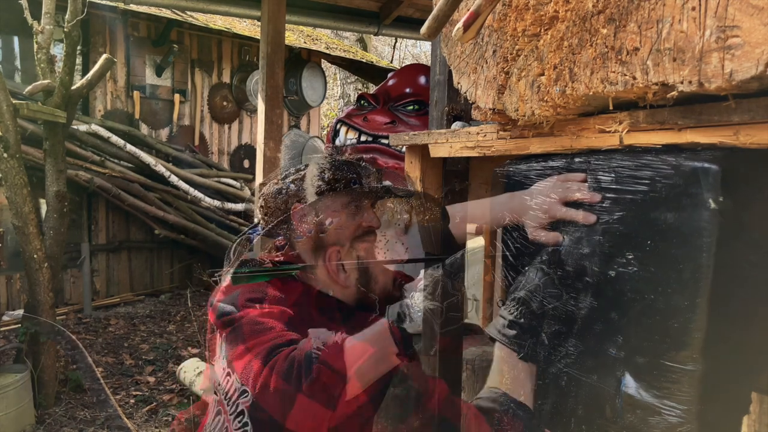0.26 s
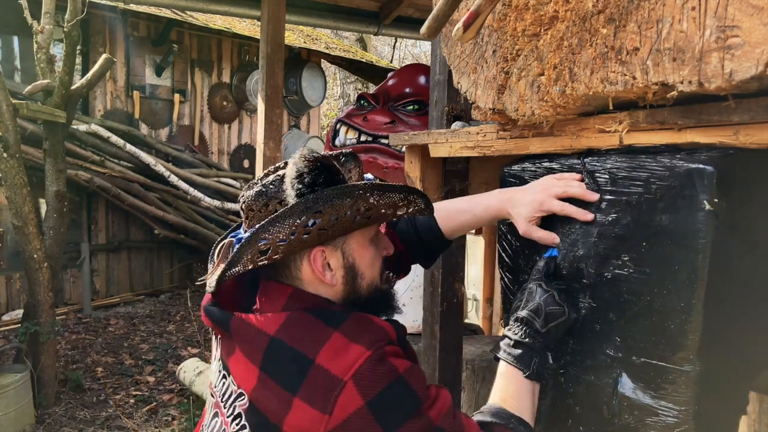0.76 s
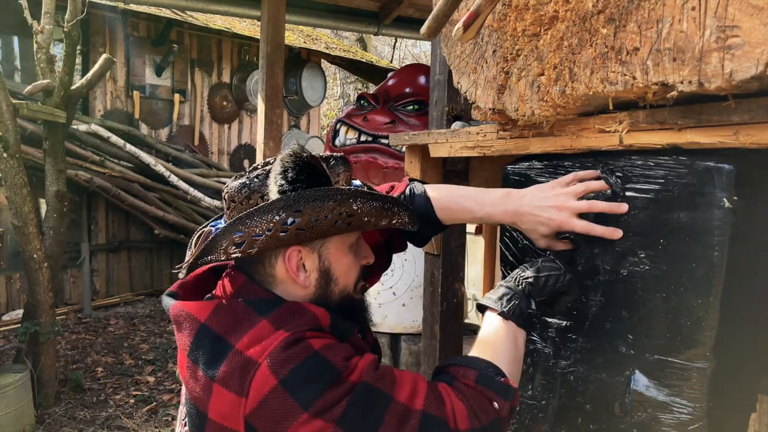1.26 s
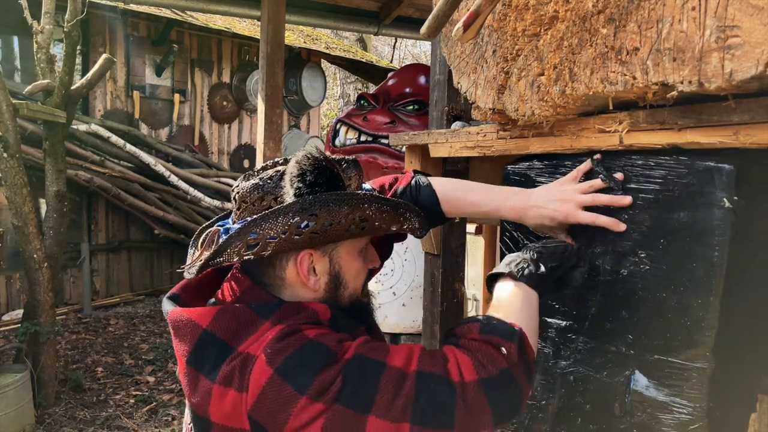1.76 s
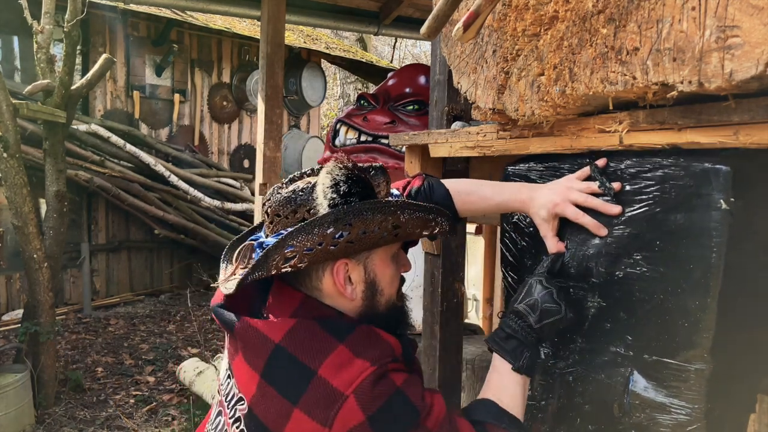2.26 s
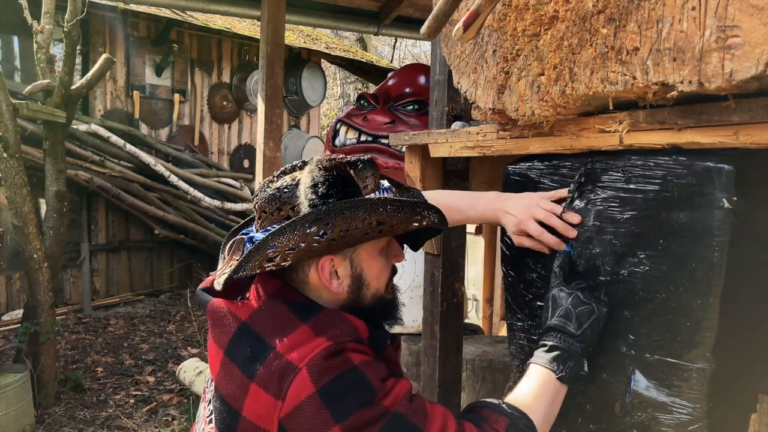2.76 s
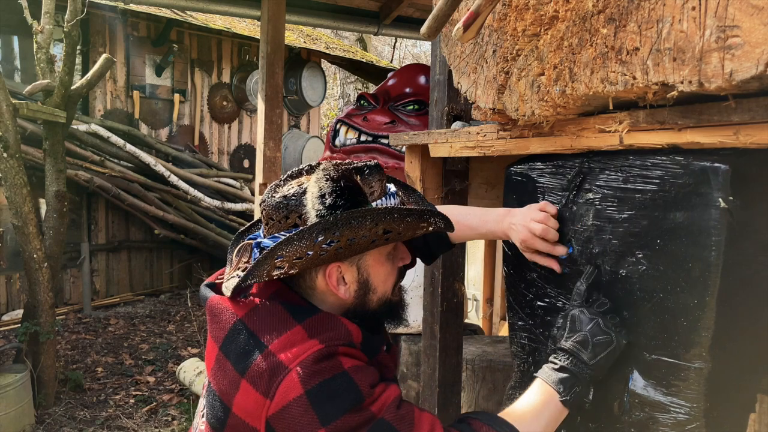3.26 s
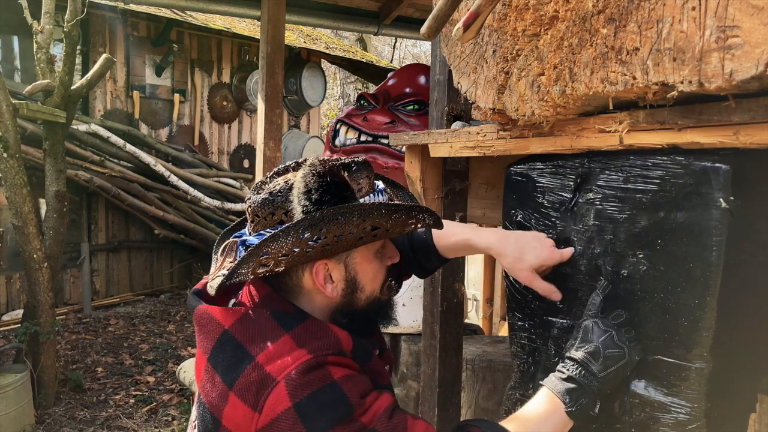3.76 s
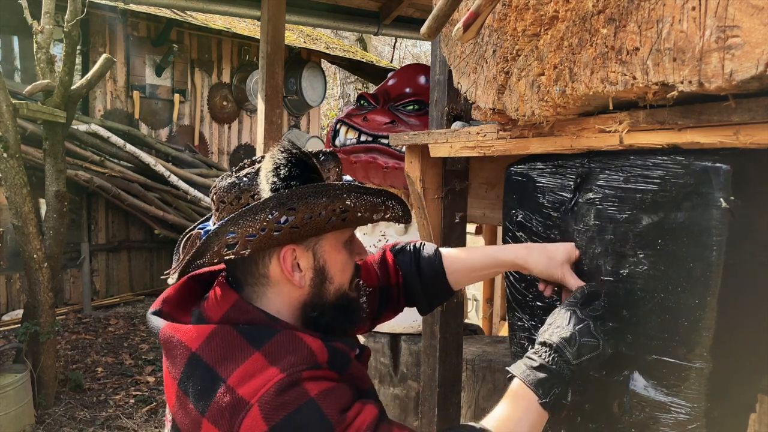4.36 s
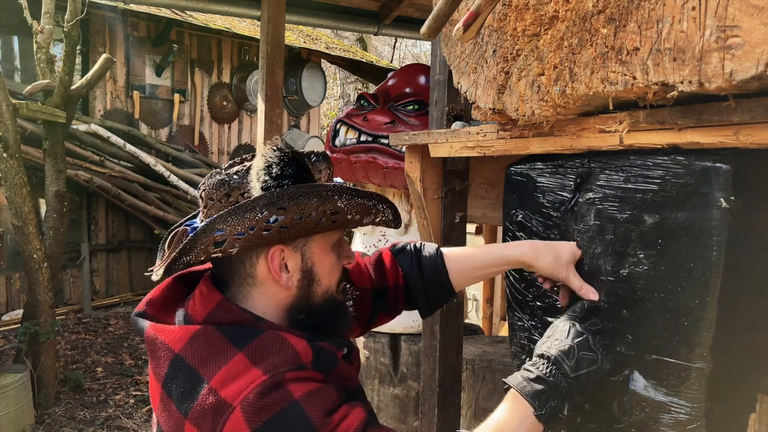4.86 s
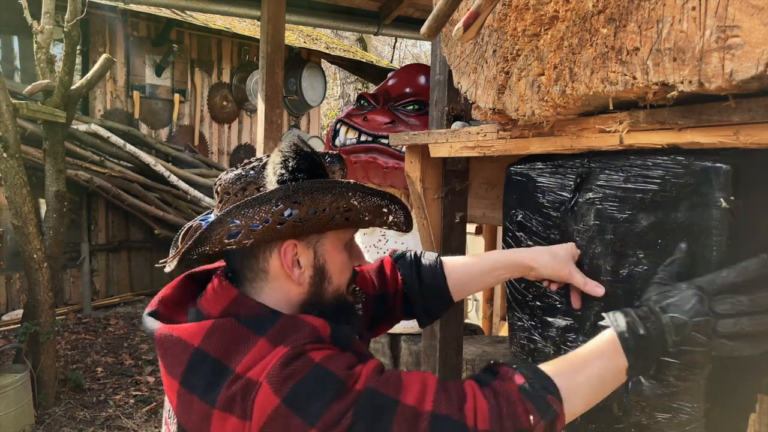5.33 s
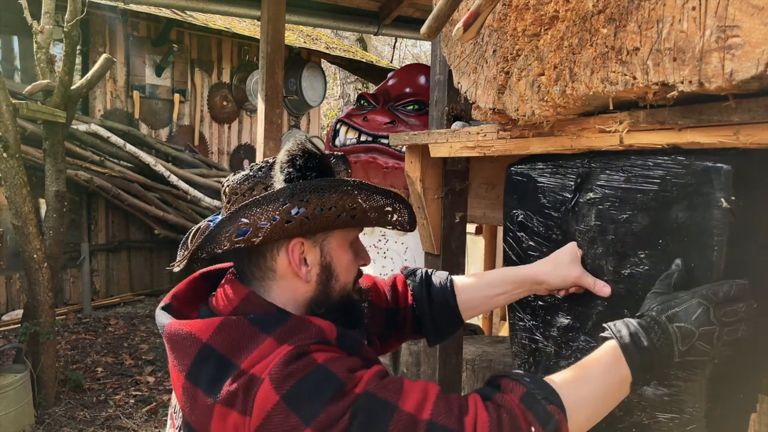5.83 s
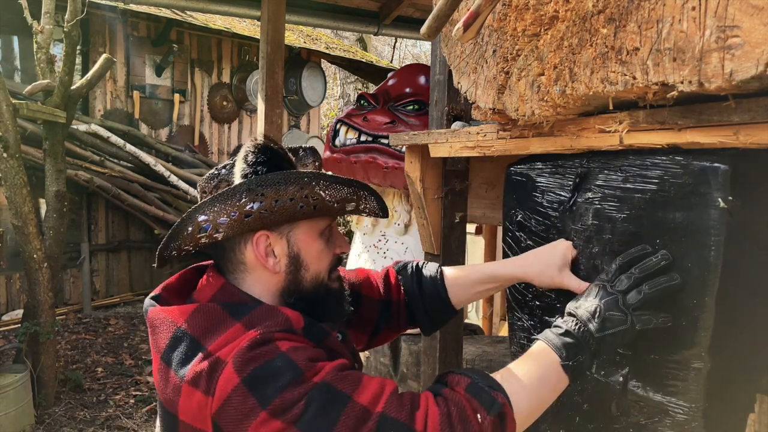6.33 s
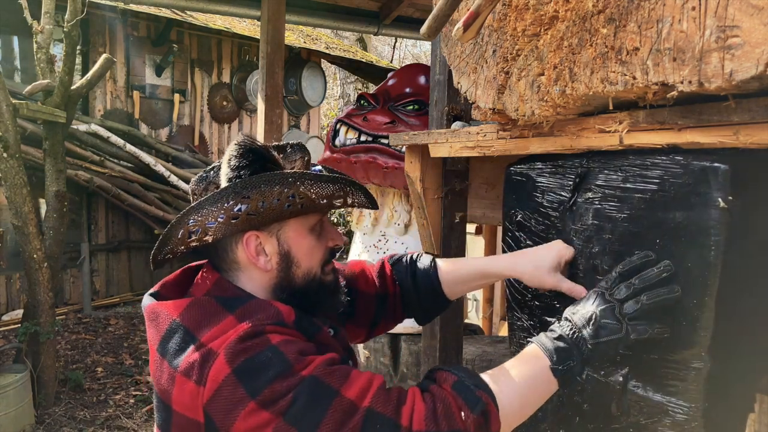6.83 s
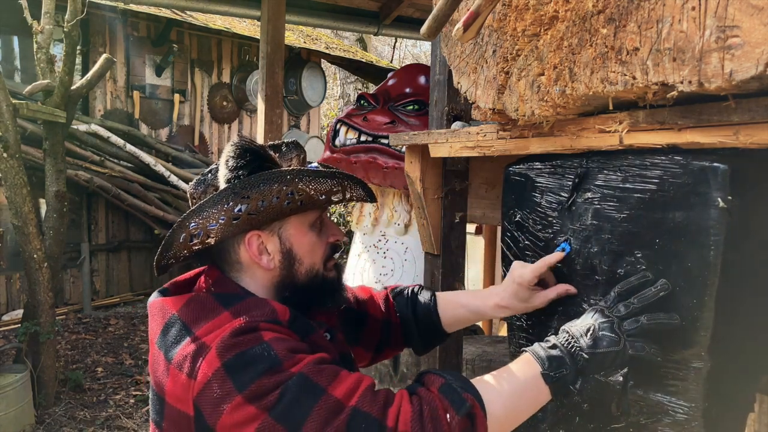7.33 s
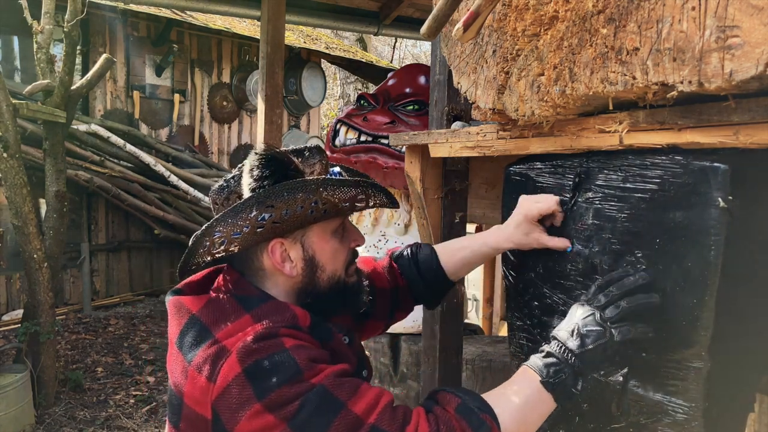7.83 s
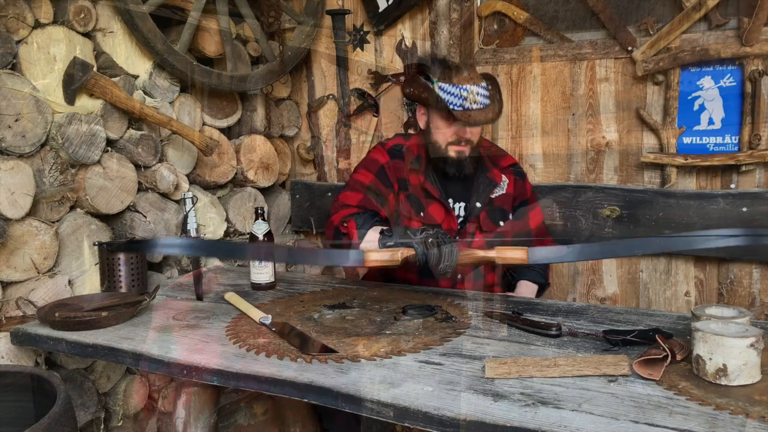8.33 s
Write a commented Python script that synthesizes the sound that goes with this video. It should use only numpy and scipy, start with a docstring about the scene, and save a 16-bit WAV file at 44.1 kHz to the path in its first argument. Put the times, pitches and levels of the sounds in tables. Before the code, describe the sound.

Very close stereo sound, outdoors under a small wooden shelter with short, soft reflections. From 0 s hands rest and creep on stretched plastic film, fizzing faintly; from 0.3 s quick strokes swell into bright crackle and coarser rubbing. Sharp crease snaps cluster from 0.6 to 2 s, with dull pats near 0.3, 1.5 and 1.9 s. Strokes continue busily to 4 s, with a brief low groan at 3.1 s. Strokes then become sparser and faint birds whistle high and burr downward. A fingertip judders at 4.5 s, a firm smack and thud lands at 5.4 s, a weaker judder follows at 5.7 s and a thin glove squeak at 6.1 s. Light rubs and snaps return around 6.9-7.7 s, with groans near 6.8 and 7.1 s. After 8.1 s come low groans, a tiny creak and a last stroke, over rising soft rumble and faint hush.

```python
"""Up close, hands rest on and stroke film stretched over an archery block in a wooden yard shelter.
The film fizzes and crackles from the start; pats thud dully and creases snap among the strokes.
From about 3 s dragging hands make the block groan; from 4 s small birds whistle and burr in the trees.
A fingertip judders from 4.5 s, a glove squeaks at 6 s and a thin creak sounds at 8.2 s, over rumble and hush.
Slip noise drives film, creases and groans; decaying modes thud; shaken tones make birds, glove and creak."""
import sys
import numpy as np
from scipy import signal
from scipy.fft import rfft, irfft, next_fast_len
from scipy.io import wavfile
from scipy.ndimage import uniform_filter1d, map_coordinates

SR = 44100
rng = np.random.default_rng(int(sys.argv[2]) if len(sys.argv) > 2 else 0)


def pcm_store(signal):
    """Save signal as 16-bit PCM."""
    levels = np.round(np.clip(np.atleast_2d(signal), -1, 1) * 32767)
    wavfile.write(sys.argv[1], SR, levels.astype(np.int16).T)


N = 378819
T = np.arange(N) / SR
PADDED = next_fast_len(N, True)
FREQS = np.fft.rfftfreq(PADDED, 1 / SR)

# colour of film struck against the block: (frequency [Hz], relative level [dB])
SMACK_COLOUR = [(100, 0), (400, -3.5), (850, 2.5), (2000, 5), (2900, -11.5), (4500, -6.5), (12000, -15)]
# level tones, bird calls but for the last row, a creak of the film or block:
# (start [s], length [s], pitch [Hz], relative strength [dB])
LEVEL_TONES = [(3.932, 0.079, 4460, -57), (4.63, 0.1, 4426, -57.5), (5.28, 0.12, 4480, -60),
               (6.019, 0.13, 4440, -55.5), (7.874, 0.1, 4500, -58), (8.219, 0.077, 1690, -55.5)]


def undb(db):
    """Decibels to gain."""
    return 10 ** (np.asarray(db) / 20)


def curve(table):
    """Gain per sample, its decibels interpolated between (time, level) points."""
    times, levels = np.transpose(table)
    return undb(np.interp(T, times, levels))


def unit(x):
    """Scale to rms 1."""
    return x / np.sqrt(np.mean(x ** 2))


def add(track, s, sound):
    """Mix a short sound into a track at time s."""
    i = int(s * SR)
    track[i:i + len(sound)] += sound[:N - i]


def response(points, size=4096):
    """Causal minimum-phase impulse response, energy 1, of a (Hz, dB) colour."""
    hz, db = np.transpose(points)
    f = np.maximum(np.fft.rfftfreq(size, 1 / SR), 1)
    gain = undb(np.interp(np.log(f), np.log(hz), db))
    # folding the cepstrum onto positive time makes the response causal
    cepstrum = irfft(np.log(gain))
    cepstrum[1:size // 2] *= 2
    cepstrum[size // 2 + 1:] = 0
    h = irfft(np.exp(rfft(cepstrum)))
    return h / np.linalg.norm(h)


def ring(x, h):
    """Pass x through an impulse response."""
    return signal.oaconvolve(x, h)[:len(x)]


def resonate(x, hz, q):
    """One damped resonance, its impulse response of energy 1."""
    b, a = signal.iirpeak(hz, q, fs=SR)
    h = signal.lfilter(b, a, signal.unit_impulse(SR // 20))
    return ring(x, h / np.linalg.norm(h))


def noise(points):
    """Steady noise in a colour, near rms 1."""
    return ring(rng.standard_normal(N), response(points))


def walk(rate):
    """Smoothed random steps of rms 1, changing rate times a second."""
    k = max(int(SR / rate), 1)
    steps = np.repeat(rng.standard_normal(N // k + 1), k)
    return unit(uniform_filter1d(steps, k)[:N])


def crackle(rate, spread_db, grip_hz, grip_db):
    """Tiny slips of the film: many small, a few large, bunched as the skin grips and lets go."""
    size = undb(spread_db * np.minimum(rng.exponential(size=N), 5))
    happens = rng.random(N) < rate / SR
    slips = happens * size * rng.choice([-1, 1], N)
    return unit(slips * undb(grip_db * walk(grip_hz)))


def patchy(x, rate, depth_db):
    """Folds of different size come and go under the hand, so each octave swells on its own."""
    spectrum = rfft(x, PADDED)
    octave = np.clip(np.log2(np.maximum(FREQS, 1) / 375), 0, 5)
    total = np.zeros(N)
    for k in range(6):
        # triangular bands that overlap and sum to the whole spectrum
        band = irfft(spectrum * np.maximum(1 - abs(octave - k), 0), PADDED)[:N]
        total += band * undb(depth_db * walk(rate))
    return unit(total)


def note(length, start_hz, end_hz, burr, flutter_db):
    """A gliding or level tone, its pitch shaken and bent by the burr and its level broken by flutter."""
    u = np.linspace(0, 1, int(length * SR))
    glide = start_hz + (end_hz - start_hz) * u
    shake = (walk(500) + 0.246 * walk(40))[:len(u)]
    hz = glide * (1 + burr * shake)
    flutter = unit(undb(flutter_db * walk(70.5)[:len(u)]))
    tone = np.sin(2 * np.pi * np.cumsum(hz) / SR)
    return flutter * tone * signal.windows.tukey(len(u), .3)


def scatter(x, t60, dull_hz):
    """Diffuse reflections, different at each port of the microphone and weaker in the treble."""
    t = T[:SR // 2]
    decay = np.exp(-np.log(1000) * t / t60)
    onset = 1 - np.exp(-t / 0.0024)
    tails = rng.standard_normal((2, len(t))) * decay * onset
    soft = signal.butter(1, dull_hz, fs=SR, output="sos")
    return np.array([ring(x, signal.sosfilt(soft, h / np.linalg.norm(h))) for h in tails])


def sliding():
    """Light sliding fizzes and flips small creases; pressure makes coarser slips that sound the taut film."""
    # colours of light slips, pressed slips and small creases: (frequency [Hz], relative level [dB])
    fizz_colour = [(300, -32), (1500, -11), (4500, -5.5), (6400, -7), (7500, -1), (10500, 0), (16000, -7)]
    rub_colour = [(80, -16), (290, 3), (600, -0.5), (780, 2.5), (1050, 0), (1750, 3.5), (2700, -1),
                  (4600, -2.5), (15000, -28)]
    tick_colour = [(300, -59), (2500, -17), (4800, 14), (7800, -11.5), (11500, 10.5), (16000, -35)]
    crinkle_db, crinkle_growth = -58, .6  # growth: power of the light sliding's strength
    light, pressed = hands()
    fizz = ring(crackle(rate=12000, spread_db=3.0, grip_hz=200.4, grip_db=1.1), response(fizz_colour))
    rub = ring(crackle(rate=3200, spread_db=2.0, grip_hz=118.9, grip_db=0.74), response(rub_colour))
    crinkle = ring(crackle(rate=70, spread_db=3.3, grip_hz=8.3, grip_db=2.5), response(tick_colour))
    fizz = patchy(fizz, rate=68, depth_db=2.3) * light
    rub = patchy(rub, rate=60, depth_db=3.0) * pressed
    return fizz + rub + undb(crinkle_db) * crinkle * unit(light) ** crinkle_growth


def hands():
    """Strength of light and of pressed sliding: the strokes add in power to the resting contact."""
    # strokes over the film: (start [s], length [s], fizz of light sliding [dB], rub of pressed sliding [dB])
    strokes = [(0.277, 0.19, -48.5, -51.5), (0.463, 0.132, -42, -45), (0.667, 0.27, -44.5, -46.5),
               (0.998, 0.3, -43, -48.5), (1.456, 0.132, -48.5, -50.5), (1.661, 0.0406, -40.5, -51.5),
               (1.861, 0.1, -41.5, -45.5), (2.04, 0.2027, -46.5, -50), (2.387, 0.1477, -41.5, -46.5),
               (2.525, 0.25, -43, -78), (2.737, 0.28, -44, -48.5), (3.085, 0.148, -43, -49),
               (3.257, 0.11, -41, -46), (3.412, 0.11, -47.5, -47.5), (3.526, 0.1117, -40.5, -47.5),
               (3.682, 0.082, -41.5, -51.5), (3.818, 0.17, -47, -54.5), (4.263, 0.165, -47, -58),
               (4.755, 0.16, -49, -56), (5.051, 0.096, -49.5, -63.5), (5.263, 0.28, -44, -54),
               (5.554, 0.34, -53, -58.5), (5.943, 0.11, -47, -51), (6.084, 0.6, -62, -54.5),
               (6.866, 0.0807, -41, -50), (7.115, 0.15, -42, -59), (7.326, 0.12, -41, -64.5),
               (7.577, 0.061, -42, -53), (7.734, .29, -55.5, -56), (8.256, 0.28, -58.5, -54),
               (8.339, 0.11, -42, -58)]
    # firmness of hands that rest and creep on the film: (time [s], relative level [dB])
    rest = [(0, -2), (.2, 4), (4.12, 4.5), (4.22, -3), (4.55, -0.5), (4.63, 2), (7.95, 3), (8.1, -7.5)]
    rest_fizz_db, rest_rub_db = -58, -63
    resting = curve(rest)
    light = (undb(rest_fizz_db) * resting) ** 2
    pressed = (undb(rest_rub_db) * resting) ** 2
    for start, length, fizz_db, rub_db in strokes:
        power = stroke(start, length) ** 2
        light = light + undb(fizz_db) ** 2 * power
        pressed = pressed + undb(rub_db) ** 2 * power
    return np.sqrt(light), np.sqrt(pressed)


def stroke(start, length):
    """Speed of the hand in one stroke, 0-1: it gathers speed, holds it and runs out."""
    attack_s, release_s = 0.022, 0.044  # time constants
    t = np.maximum(T - start, 0)
    return (1 - np.exp(-t / attack_s)) * np.exp(-np.maximum(t - length, 0) / release_s)


def snaps(q=2.1, body_db=-14, spray_s=0.0033, spray_db=-28.5):
    """A crease flips in one sharp step and rings at its fold's pitch; film around it crinkles for a moment."""
    # creases letting go: (time [s], strength [dB], pitch of the fold [Hz])
    creases = [(.3066, -17.5, 8500), (.5716, -18.5, 2760), (.633, -17, 13500), (.6767, -18, 10500),
               (.8187, -9, 10200), (0.8652, -12, 13500), (1.0565, -10.5, 11500), (1.1414, -11.5, 9800),
               (1.1873, -5, 10700), (1.3038, -20, 3800), (1.5235, -8.5, 13100), (1.5534, -10.5, 11500),
               (1.7626, -20, 12000), (1.9182, -9, 7560), (2.0737, -18.5, 6960), (2.8451, -18, 9000),
               (3.2393, -23, 14500), (3.323, -14, 4970), (3.8456, -14, 11000), (3.9013, -15.5, 9200),
               (3.9712, -19, 5200), (4.1356, -19.5, 10500), (5.775, -26, 9400), (6.9847, -14.5, 6300),
               (7.0671, -23.5, 6400), (7.0791, -22, 11000), (7.325, -20.5, 11000), (7.3315, -27, 12400),
               (7.6358, -10, 10100), (7.6382, -14, 2830), (8.313, -26, 4200)]
    track, t = np.zeros(N), T[:SR // 20]
    body = undb(body_db) * response(SMACK_COLOUR)
    for s, db, hz in creases:
        spray = undb(spray_db) * np.exp(-t / spray_s) * rng.standard_normal(len(t))
        force = signal.unit_impulse(len(t)) + spray
        add(track, s, undb(db) * (resonate(force, hz, q) + ring(force, body)))
    return track


def pats():
    """A hand lands: film smacks against the block, whose damped modes thud a little differently each time."""
    # pats at the block: (time [s], peak of the thud [dB], peak of the film's smack [dB])
    landings = [(.268, -49.5, -31.5), (1.523, -38, -37), (1.907, -54, -26.5), (1.951, -47, -33.5),
                (1.97, -36.5, -33.5), (3.12, -43, -42), (3.76, -45, -32.5), (5.4241, -38, -21),
                (5.431, -24.5, -34), (6.853, -42, -38), (8.346, -39.5, -48)]
    # modes of the wrapped block at mean tension: (frequency [Hz], relative level [dB], t60 [s])
    modes = [(57, -0.5, 0.37), (80, 5, 0.241), (126.3, 1.5, 0.28), (175.6, 2, 0.18), (235.1, 6, 0.092),
             (288, 7.5, 0.0733), (368.4, 8, 0.1044), (442, -2.5, 0.11)]
    track, t = np.zeros(N), T[:SR // 3]
    film = response(SMACK_COLOUR)
    for s, thud_db, smack_db in landings:
        tension = 1 + 0.0208 * rng.standard_normal()
        thud = np.zeros(len(t))
        for hz, db, t60 in modes:
            cycles = tension * hz * t + rng.random()
            thud += undb(db - 60 * t / t60) * np.sin(2 * np.pi * cycles)
        thud *= 1 - np.exp(-t / 0.0015)
        smack = ring(rng.standard_normal(len(t)) * np.exp(-t / 0.014), film)
        thud *= undb(thud_db) / np.abs(thud).max()
        smack *= undb(smack_db) / np.abs(smack).max()
        add(track, s, thud + smack)
    return track


def drags(q=2.3):
    """Coarse slips under a heavy hand reach the block, which groans at a pitch set by the hand's place."""
    # heavy drags: (start [s], length [s], pitch [Hz], level before the fades [dB])
    groans = [(3.098, 0.092, 296, -50.5), (6.839, 0.17, 363, -52), (7.093, 0.13, 372, -53.5),
              (8.099, 0.091, 239, -55), (8.22, 0.36, 310, -52.5)]
    track = np.zeros(N)
    slips = crackle(rate=790, spread_db=2.5, grip_hz=65.7, grip_db=0.5)
    for s, length, hz, db in groans:
        force = slips[int(s * SR):][:int(length * SR)]
        groan = unit(resonate(force, hz, q)) * signal.windows.tukey(len(force), .5)
        add(track, s, undb(db) * groan)
    return track


def judder(hz=720, swell_s=0.00091, waver=0.165, skid_s=0.0272, skid_db=-10):
    """Each fingertip slip plucks a patch of film for a few uneven cycles; the skid keeps it sounding."""
    # a fingertip sticking and slipping on taut film: (time [s], strength of the pluck [dB])
    slips = [(4.511, -42), (4.535, -40.5), (4.545, -38.5), (4.584, -34.5), (4.591, -42), (4.600, -34.5),
             (4.607, -41), (5.692, -44), (5.728, -45.5), (5.742, -42.5)]
    track, t = np.zeros(N), T[:SR // 20]
    for s, db in slips:
        phase = 2 * np.pi * np.cumsum(hz * (1 + waver * walk(490)[:len(t)])) / SR
        pluck = t / swell_s * np.exp(1 - t / swell_s)
        skid = undb(skid_db) * np.exp(-t / skid_s)
        add(track, s, undb(db) * (pluck + skid) * np.sin(phase))
    return track


def squeaks():
    """The glove skids on taut film in short, thin squeaks."""
    # glove on film: (start [s], length [s], start pitch [Hz], end pitch [Hz], strength [dB])
    skids = [(6.059, 0.1, 2130, 1853, -54), (6.064, 0.036, 1263, 1327, -52), (6.067, 0.06, 3020, 2500, -49),
             (6.07, 0.12, 810, 750, -57.5)]
    track = np.zeros(N)
    for s, length, start_hz, end_hz, db in skids:
        add(track, s, undb(db) * note(length, start_hz, end_hz, burr=0.0262, flutter_db=4.5))
    return track


def level_tone(track, row):
    """Add one tone that keeps its pitch but for a slight shake, its level fluttering."""
    s, length, hz, db = row
    add(track, s, undb(db) * note(length, hz, hz, burr=0.0088, flutter_db=5.5))


def creak():
    """One short thin creak of the film or block at 8.2 s, a slightly shaken tone."""
    track = np.zeros(N)
    level_tone(track, LEVEL_TONES[-1])
    return track


def ports(x):
    """Near sound from the right bends round the camera body and reaches the left port late and coloured."""
    # phase by which the left port trails the right: (frequency [Hz], phase [rad])
    port_phase = [(0, 0), (750, .55), (3900, 1.1), (5600, 3.1), (6900, 6.2), (8000, 7.3), (9150, 9.4),
                  (10400, 11.9), (12300, 13.1), (13650, 15.7), (15200, 18.7)]
    # how much louder the left port hears the near sounds: (frequency [Hz], level [dB])
    port_db = [(300, 0), (750, -3), (1900, 3), (3700, 3.5), (4800, 0)]
    lag_drift_s = 5e-6  # rms drift of the lag as the hands move
    phase = np.interp(FREQS, *np.transpose(port_phase))
    lean = undb(np.interp(FREQS, *np.transpose(port_db)) / 2)  # half the difference at each port
    paths = np.array([lean * np.exp(-1j * phase), 1 / lean])
    left, right = irfft(rfft(x, PADDED) * paths, PADDED)[:, :N]
    drifted = (T - lag_drift_s * walk(4)) * SR
    return np.array([map_coordinates(left, [drifted], order=5, mode="mirror"), right])


def sheet(db=-15.0):
    """The stretched film also crackles all round the hands, so each port hears different grains."""
    grains = []
    for _ in range(2):
        slips = crackle(rate=3000, spread_db=3.0, grip_hz=90.4, grip_db=3.9)
        grains.append(resonate(slips, hz=3430, q=3.3))
    light, _ = hands()
    return undb(db) * np.array(grains) * light


def shelter(near):
    """Reflections from roof and posts, whose pattern shifts as the arms move."""
    one, other = (scatter(near, t60=0.081, dull_hz=7040) for _ in range(2))
    turn = np.pi * walk(3)
    return undb(-9.0) * (np.cos(turn) * one + np.sin(turn) * other)


def birds():
    """Clear high whistles near 4.4-4.5 kHz, and rough notes that fall in pitch, shaken and broken."""
    # burry notes: (start [s], length [s], start pitch [Hz], end pitch [Hz], relative strength [dB])
    burrs = [(4.94, 0.12, 4020, 3190, -57.5), (6.336, 0.1607, 3240, 2050, -57.5),
             (6.539, 0.53, 3530, 3276, -60), (7.685, 0.14, 4070, 3020, -53.5)]
    track = np.zeros(N)
    for row in LEVEL_TONES[:-1]:
        level_tone(track, row)
    for s, length, start_hz, end_hz, db in burrs:
        add(track, s, undb(db) * note(length, start_hz, end_hz, burr=0.042, flutter_db=3.5))
    return track


def surroundings(x):
    """Sound heard straight, alike at both ports, and more strongly in a longer diffuse tail."""
    return undb(2.5) * x + undb(6.0) * scatter(x, t60=0.56, dull_hz=8100)


def air():
    """Low rumble of moving arms, alike at both ports, over the faint hush of the yard."""
    # arms and sleeves shifting against the block: (time [s], relative level [dB])
    shift = [(0, -58), (.8, -52.5), (2.4, -59.5), (3.2, -52), (4.1, -57.5), (7.95, -58), (8.37, -45),
             (8.58, -47)]
    # colours of the arms' rumble and the yard's hush: (frequency [Hz], relative level [dB])
    rumble_colour = [(25, -37), (45, 1), (78, 1.5), (100, -1), (127, 2), (175, -12), (1500, -49.5)]
    yard_colour = [(25, -13), (80, 14.5), (250, 8.5), (5500, -4.5), (15000, -84)]
    rumble = noise(rumble_colour) * curve(shift) * undb(-1.5)
    hush = np.array([noise(yard_colour), noise(yard_colour)])
    return rumble + undb(-64.0 + 2.5 * walk(3)) * hush


def scene():
    """The near hands under the shelter roof, the creak, and the birds among the trees."""
    near = sliding() + snaps() + pats() + drags() + judder() + squeaks()
    return ports(near) + sheet() + shelter(near) + surroundings(creak() + birds()) + air()


def record(dry):
    """The camera cuts the top of the treble with a steep low-pass."""
    top_hz = 15850
    return signal.sosfilt(signal.ellip(10, .2, 70, top_hz, fs=SR, output="sos"), dry)


dry = scene()
out = record(dry)
pcm_store(out)
```